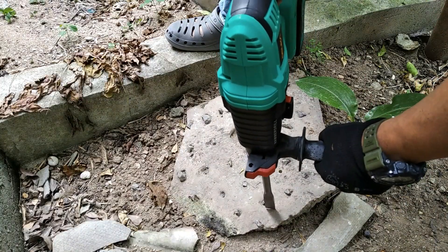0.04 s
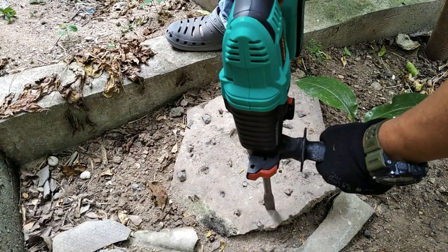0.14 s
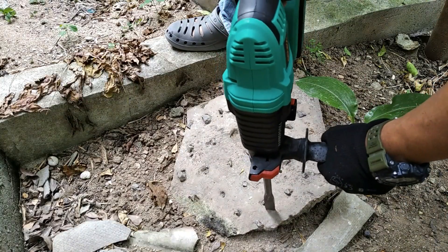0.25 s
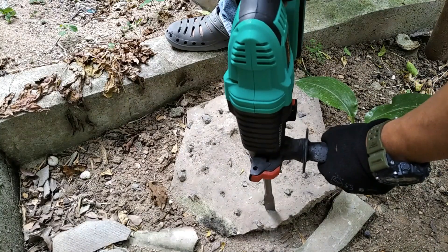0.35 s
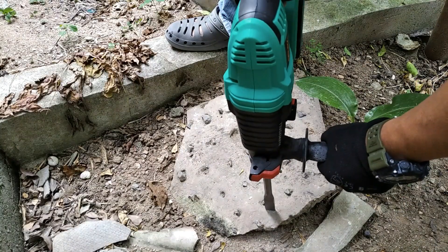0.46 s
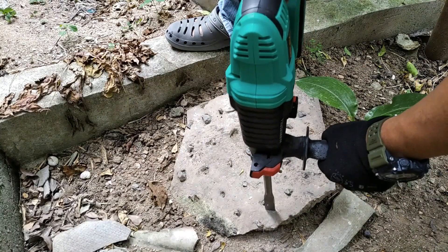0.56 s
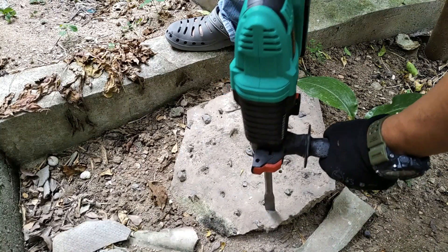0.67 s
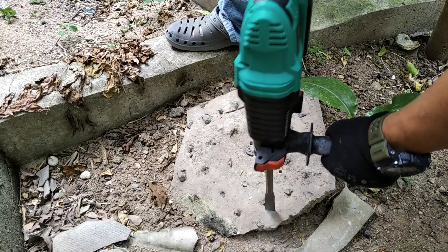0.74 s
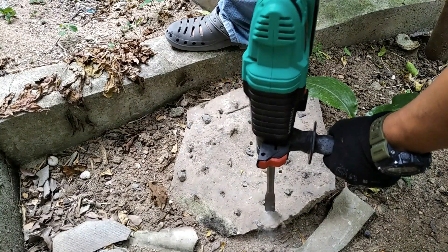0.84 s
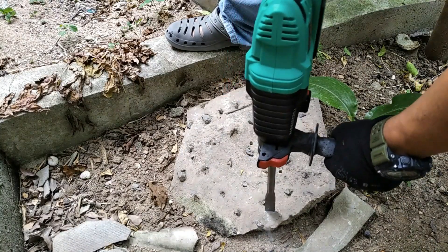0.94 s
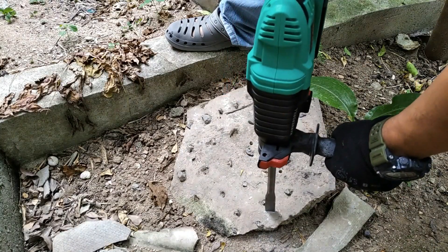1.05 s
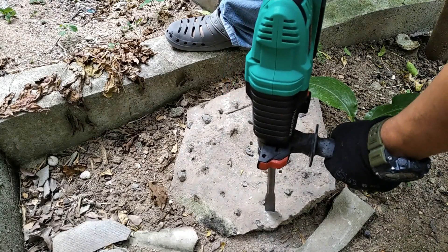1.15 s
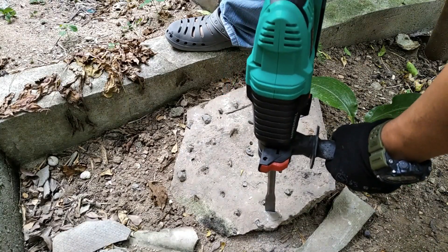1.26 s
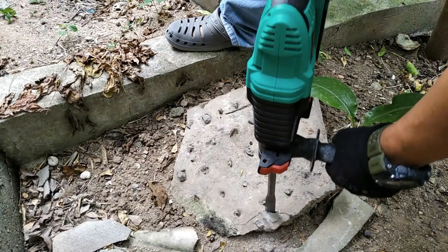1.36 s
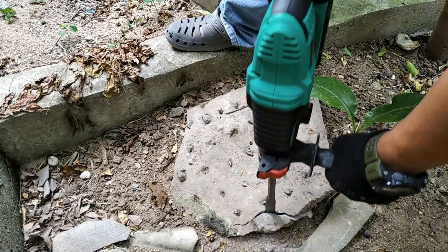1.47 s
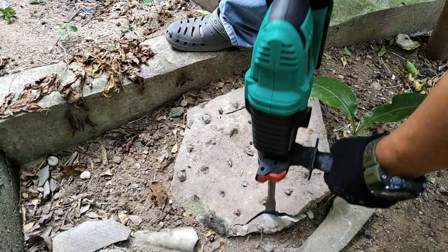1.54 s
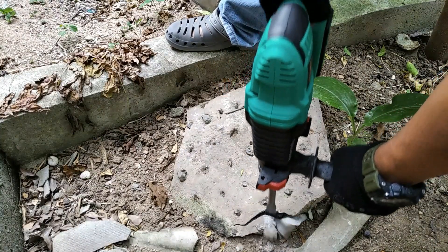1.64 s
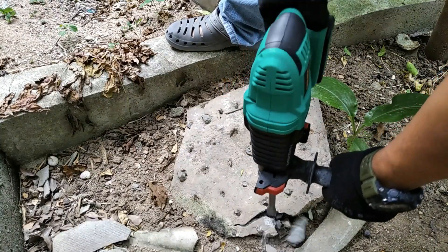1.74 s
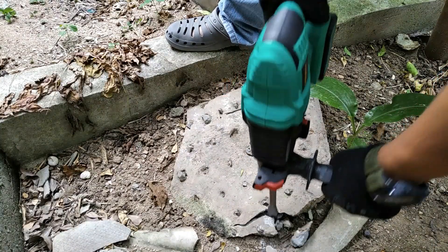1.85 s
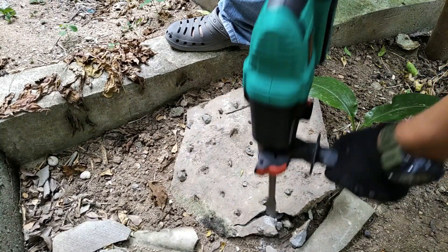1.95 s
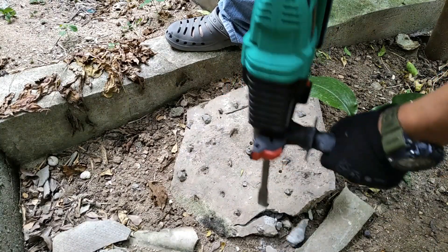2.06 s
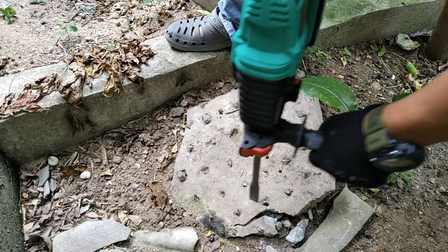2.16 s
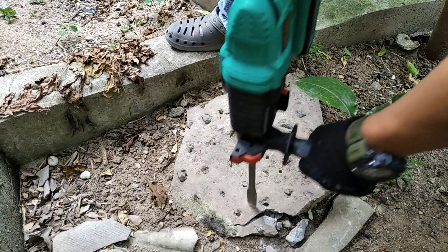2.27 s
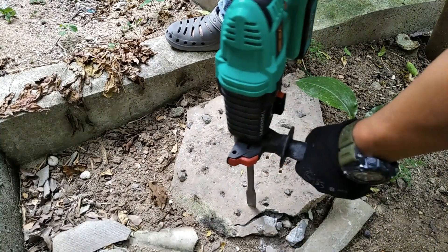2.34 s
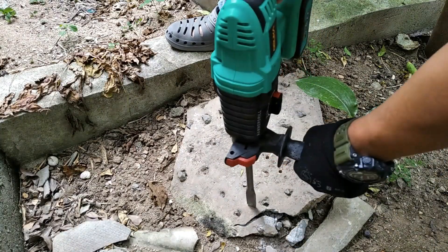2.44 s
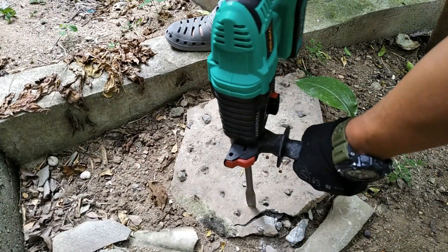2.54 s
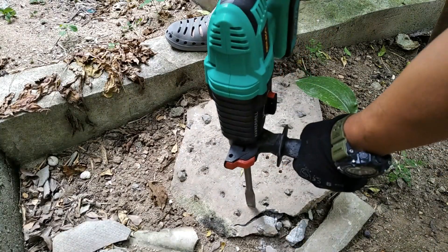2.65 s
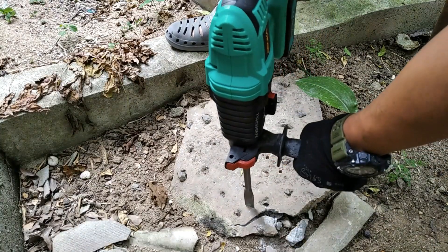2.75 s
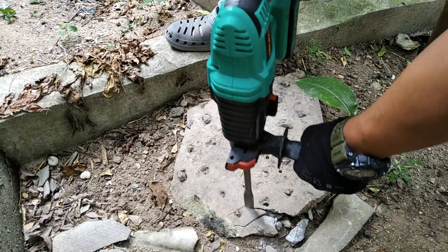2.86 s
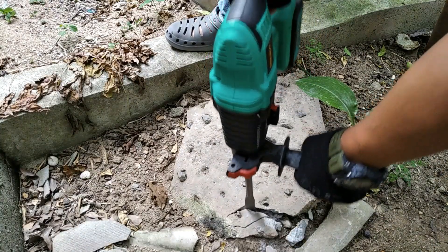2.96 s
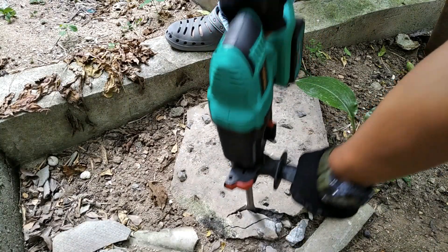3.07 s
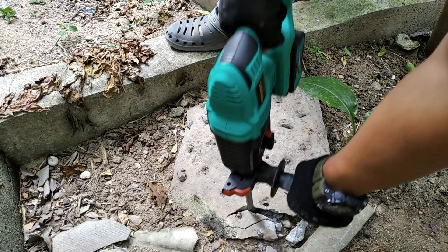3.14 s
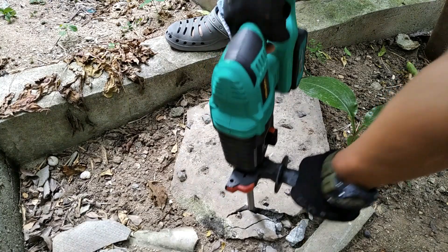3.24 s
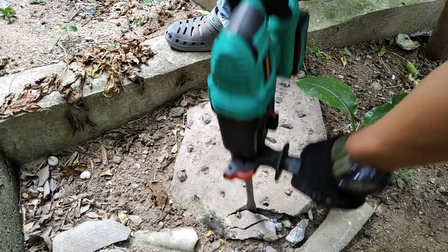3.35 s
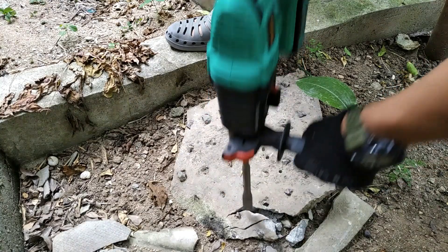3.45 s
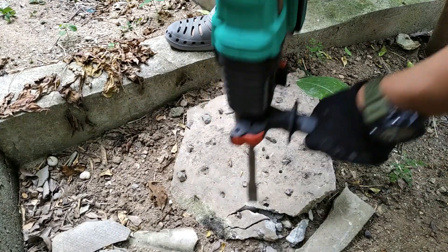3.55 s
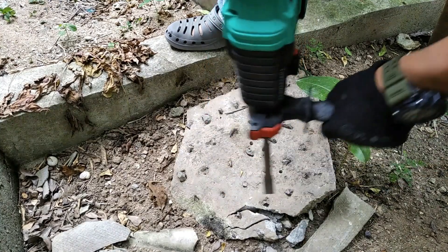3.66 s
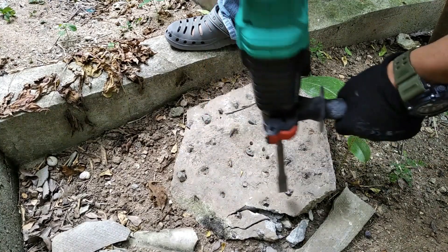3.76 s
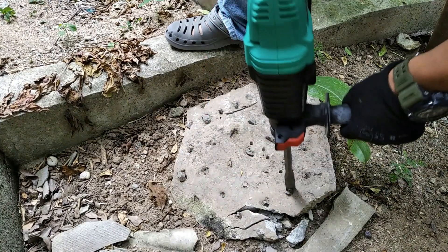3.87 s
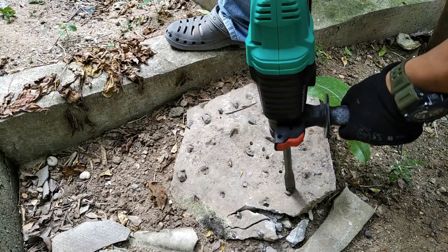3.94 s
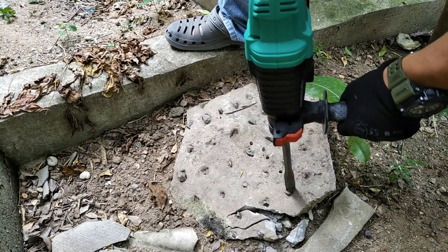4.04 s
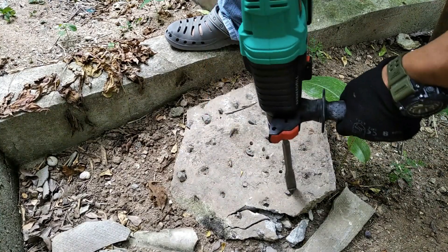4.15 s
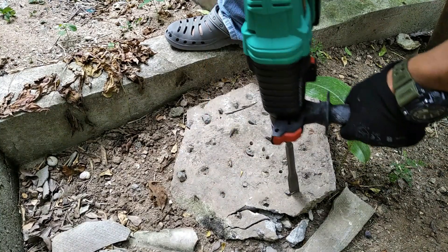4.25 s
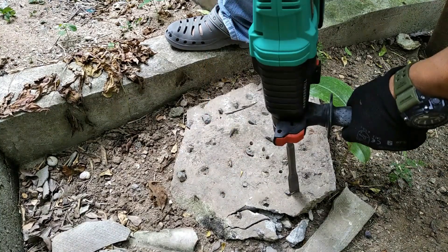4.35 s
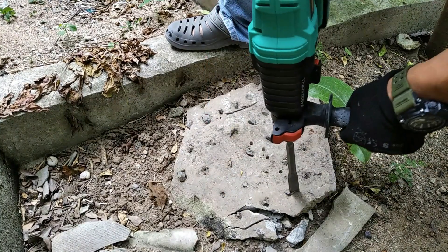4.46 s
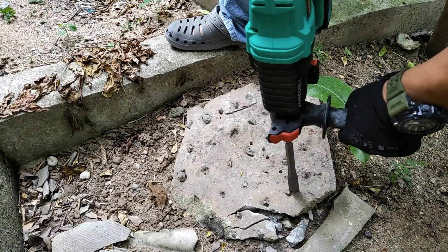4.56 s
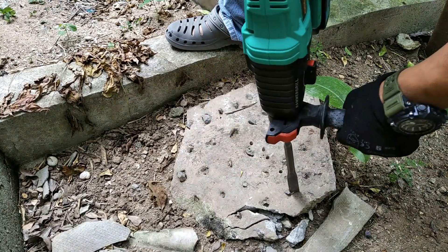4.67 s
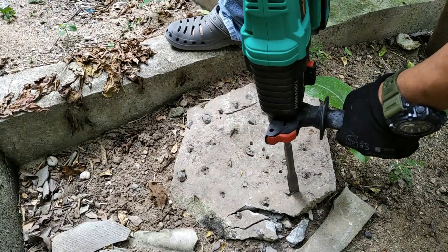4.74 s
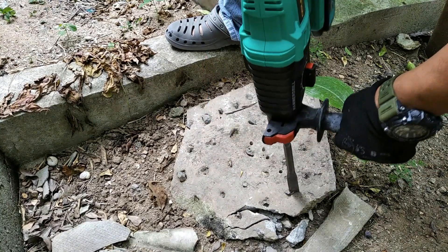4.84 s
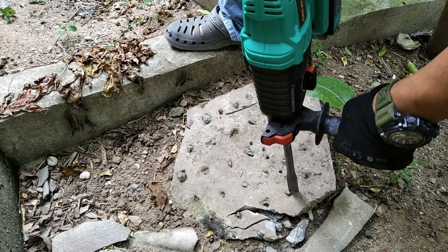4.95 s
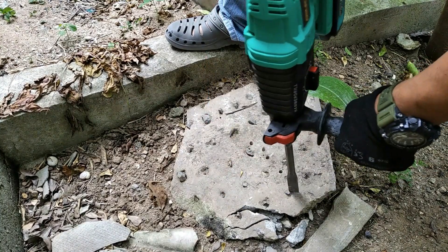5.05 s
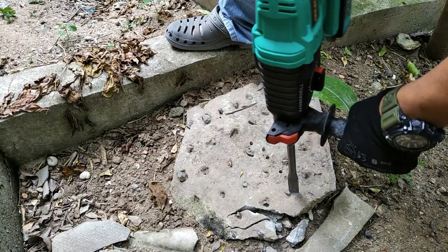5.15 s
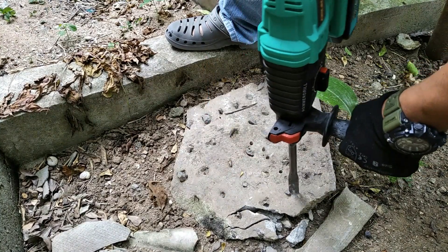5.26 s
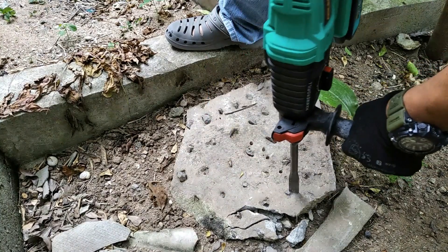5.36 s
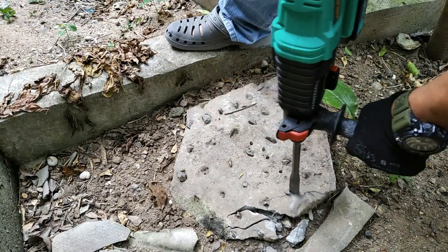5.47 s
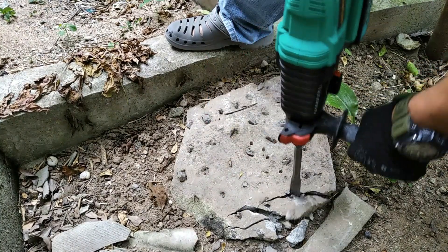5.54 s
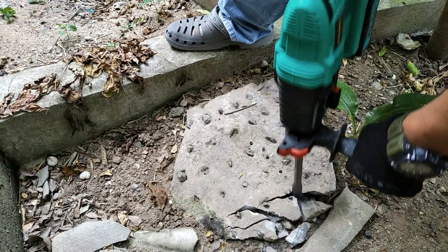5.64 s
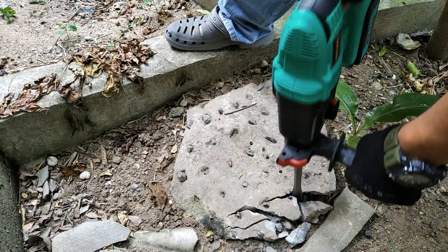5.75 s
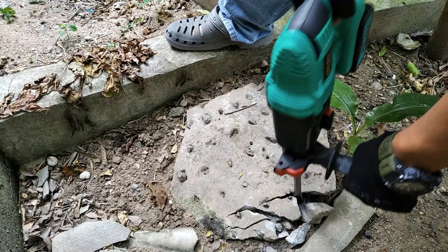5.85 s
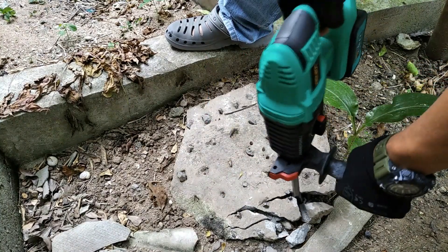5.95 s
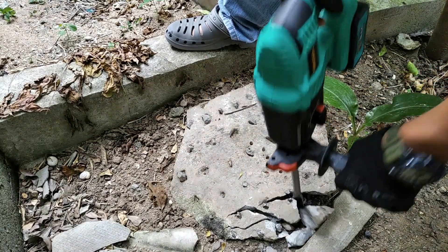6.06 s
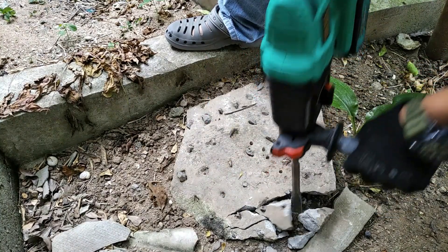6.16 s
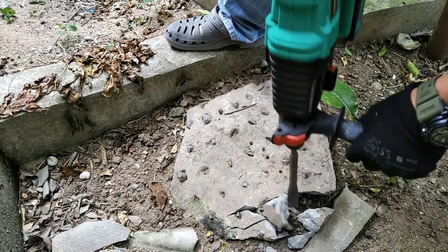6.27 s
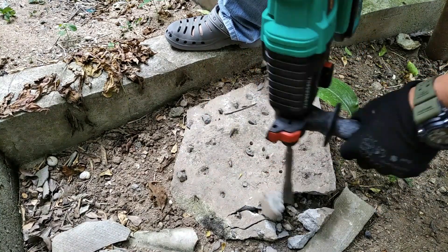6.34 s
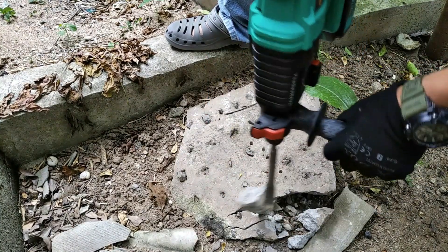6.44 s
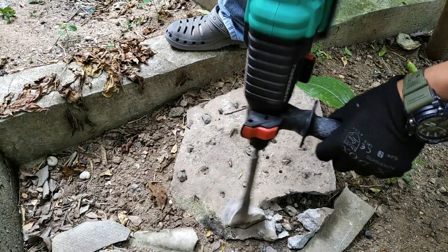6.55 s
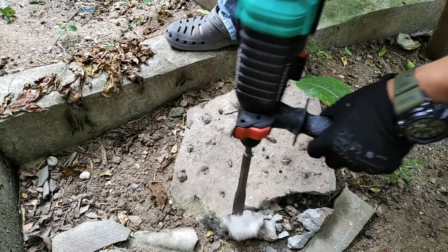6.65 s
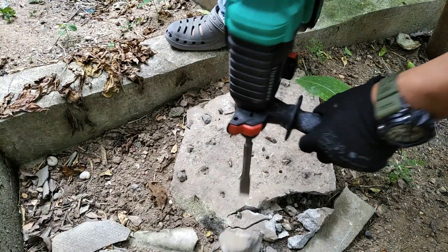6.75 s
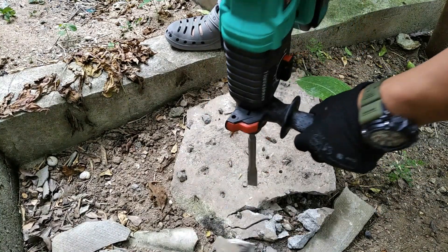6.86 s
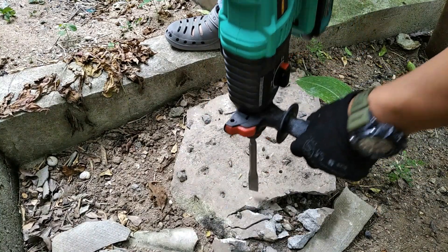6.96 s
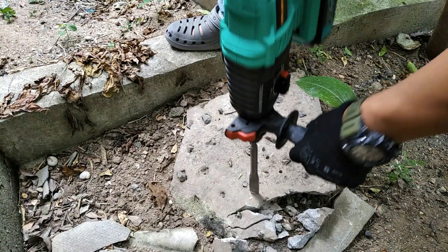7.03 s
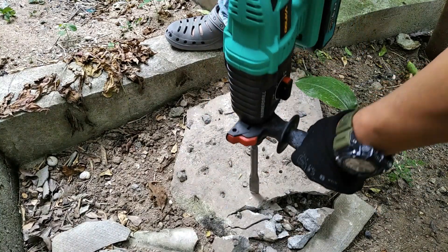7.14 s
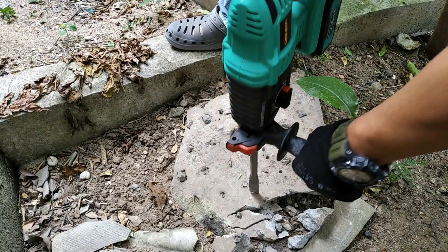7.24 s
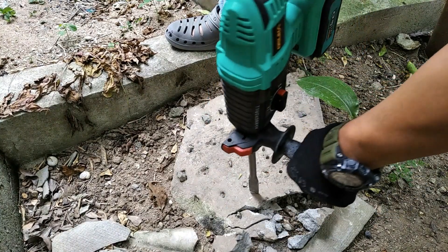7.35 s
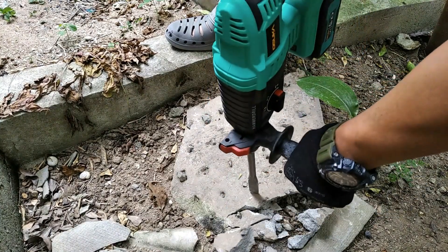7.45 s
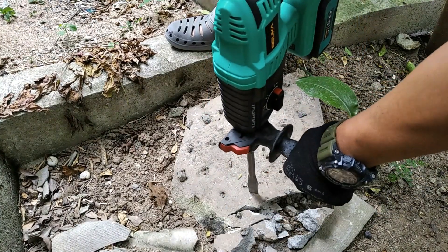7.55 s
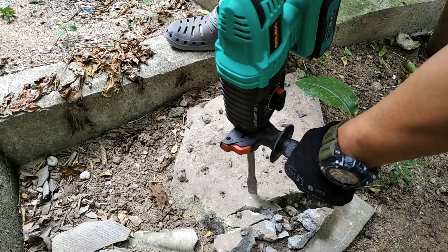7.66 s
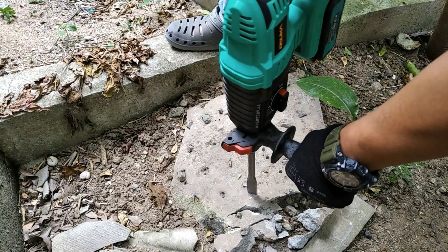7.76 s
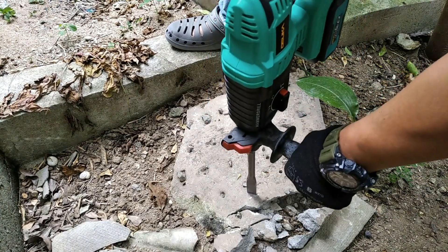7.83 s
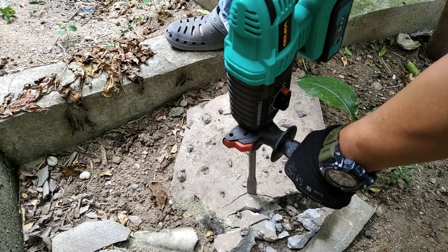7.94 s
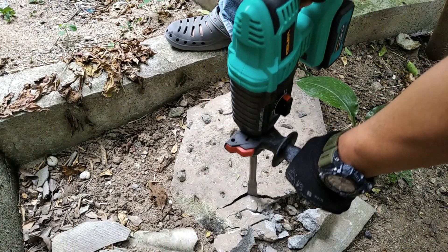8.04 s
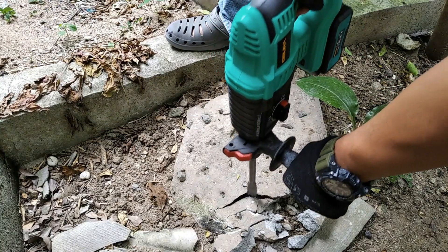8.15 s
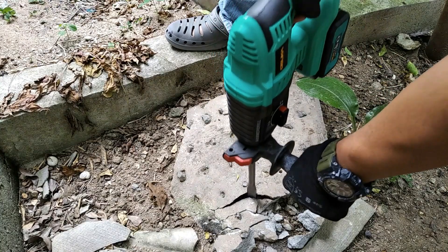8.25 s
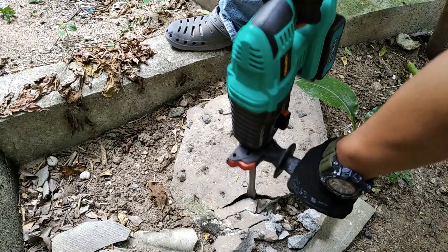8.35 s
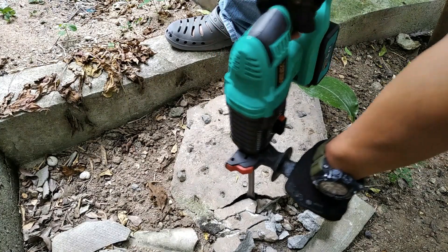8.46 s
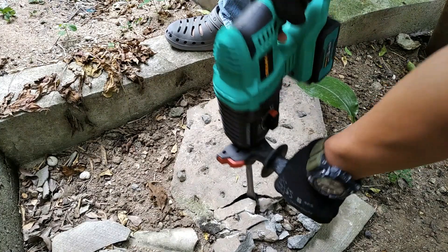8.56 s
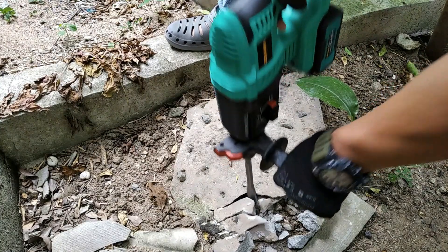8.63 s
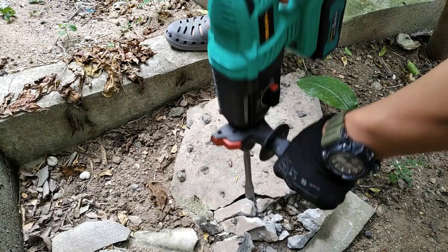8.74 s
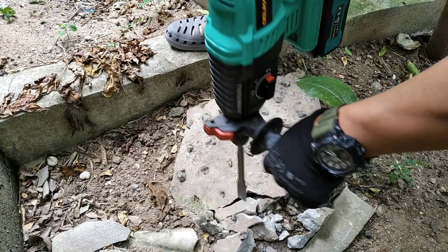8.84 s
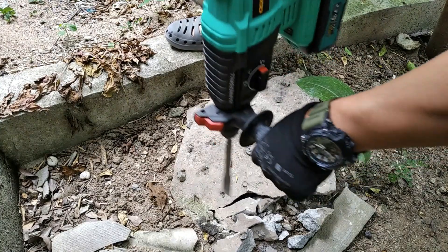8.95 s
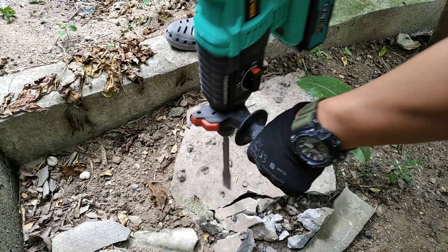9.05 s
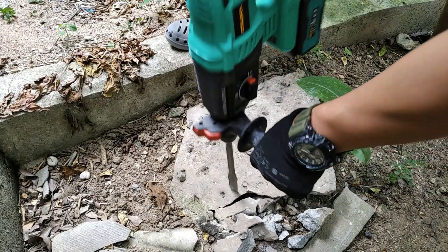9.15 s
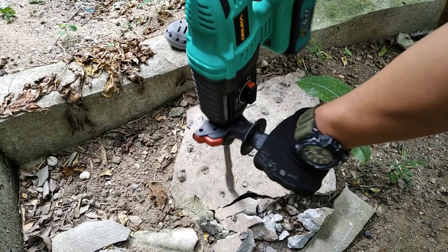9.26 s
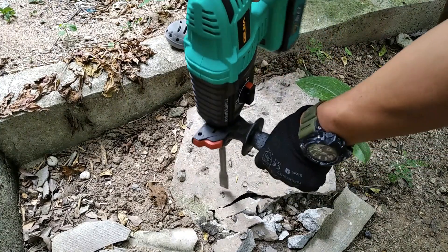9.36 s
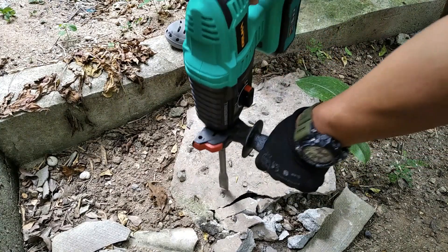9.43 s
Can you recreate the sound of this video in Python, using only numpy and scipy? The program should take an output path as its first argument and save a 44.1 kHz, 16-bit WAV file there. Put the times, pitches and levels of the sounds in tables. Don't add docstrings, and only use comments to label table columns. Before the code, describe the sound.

Close stereo outdoors, with low town hum and a dove's faint purr. At about 0.1 s a switch clicks and a cordless rotary hammer starts, thudding through concrete over gritty gearbox rattle. It dips near 1.2 s, is pulled again, and at 1.6 s the slab splits: thuds thin, bright cracks, hiss and ringing steel take over until it slows by 2.3 s. A knock on stone at 2.5 s, a very faint far horn from 2.3 to 3.5 s. Second burst 2.7-3.8 s, breaking at 3.1 with a sharp clang at 3.2. Knocks and a short scrape around 4.0-4.5 s. Third burst 4.7-6.3 s, whining as it speeds up, splitting at 5.7. Rubble clacks, chips and a soft coo, 6.4-7.5 s. Last burst 7.55-9.1 s, bright from 8.1, winding down after 8.7; final knocks at 9.4 s as the dove coos.

```python
import sys
import numpy as np
from scipy import signal
from scipy.fft import rfft, irfft
from scipy.io import wavfile
from scipy.ndimage import uniform_filter1d

SR = 44100
rng = np.random.default_rng(int(sys.argv[2]) if len(sys.argv) > 2 else 0)


def how_loud(loudness_db):
    steps = np.asarray(loudness_db, float) / 20
    return 10 ** steps


def inscribe(sig):
    pcm = np.round(np.clip(np.atleast_2d(sig).T, -1, 1) * 32767)
    wavfile.write(sys.argv[1], SR, pcm.astype(np.int16))


N = 418950
T = np.arange(N) / SR

# t/s, rate/(blows per s)
SPEED = [
    [(.067, 5), (.125, 11.99), (.3381, 33.87), (.8087, 34.11), (.9529, 52.76), (1.0225, 58.13),
     (1.1125, 53.57), (1.1598, 24.64), (1.2358, 4.94)],
    [(1.2358, 4.94), (1.3144, 18.96), (1.5746, 56.21), (1.8936, 59.91), (2.006, 16.1), (2.1814, 11.58),
     (2.297, 5.87)],
    [(2.706, 5), (2.7526, 14.3), (3.0294, 55.24), (3.4103, 61.38), (3.5385, 23.5), (3.6515, 5.91),
     (3.825, 6.32)],
    [(4.683, 12), (4.736, 24.35), (4.7946, 27.45), (5.0191, 60.6), (5.1691, 57.85), (5.2167, 62.91),
     (5.4592, 58.57), (6.0418, 61.19), (6.286, 30.66)],
    [(7.552, 4.9), (7.589, 13.14), (7.866, 53.49), (7.95, 57.57), (8.6717, 60.92), (8.7301, 31.05),
     (9.0072, 9.86), (9.122, 7.52)],
]
# tip firmly seated t/s, slab splits t/s, tool lifts off t/s
STAGES = [
    (.1, 1.26, 1.27),
    (1.3, 1.57, 2.0),
    (2.74, 3.082, 3.48),
    (5.2, 5.69, 6.2),
    (7.64, 8.115, 8.715),
]
# f/Hz, level/dB
RATTLE_SPECTRUM = [(29, -60), (50, -16), (113, -21), (147, -12.5), (294, -14.5), (332, -11), (612, -9),
                   (750, 2.5), (1690, 0.5), (2250, 1.5), (3990, -2.5), (5090, -21.5), (6500, -20),
                   (8450, -52.5), (14300, -120)]
# f/Hz, level/dB
HISS_SPECTRUM = [(3240, -39), (5500, -13.5), (5870, -13), (7320, -8), (8160, 1), (10700, -0.5),
                 (13400, -6.5), (14300, -16), (14700, -28.5), (15500, -76.5)]


def rms_one(x):
    return x / np.sqrt(np.mean(x ** 2) + 1e-20)


def ramp(t, end_s, length_s):
    return np.clip(1 + (t - end_s) / length_s, 0, 1)


def in_time(tables, silent=-120):
    out = np.full((len(tables[0][0]) - 1, N), float(silent))
    for rows in tables:
        s, *columns = np.transpose(rows)
        inside = (T >= s[0]) & (T <= s[-1])
        out[:, inside] = [np.interp(T[inside], s, c) for c in columns]
    return out


def coloured(x, spectrum):
    hz, db = np.transpose(spectrum)
    grid_hz = np.arange(2049) * SR / 4096
    log_gain = np.log(how_loud(np.interp(np.log(grid_hz + 1), np.log(hz), db)))
    cepstrum = irfft(log_gain) * np.r_[1, np.full(2047, 2), 1, np.zeros(2047)]
    response = irfft(np.exp(rfft(cepstrum)))
    return signal.oaconvolve(x, np.broadcast_to(response, (2, 4096)), axes=1)[:, :N]


def stereo_noise(alike):
    mid, side = rng.standard_normal((2, N))
    alike = np.clip(alike, 0, 1)
    return np.sqrt(1 + alike) * mid + np.sqrt(1 - alike) * side * [[1], [-1]]


def drift(rate_hz):
    r = np.exp(-2 * np.pi * rate_hz / SR)
    wander = signal.lfilter([1], [1, -2 * r, r * r], rng.standard_normal(N + SR))
    return rms_one(wander[SR:])


def resonate(x, hz, width_hz):
    r = np.exp(-np.pi * width_hz / SR)
    poles = [1, -2 * r * np.cos(2 * np.pi * hz / SR), r * r]
    return signal.lfilter([(1 - r * r) / 2, 0, (r * r - 1) / 2], poles, x + 1e-18)


def walls(x, wet_db, t60):
    echo = rng.standard_normal((2, 2600)) * how_loud(-60 * np.arange(2600) / SR / t60)
    echo *= how_loud(wet_db) / np.linalg.norm(echo, axis=1, keepdims=True)
    echo[:, 0] = 1
    return signal.oaconvolve(np.broadcast_to(x, (2, N)), echo, axes=1)[:, :N]


def puffs(clicks, t60, rise_s=0.0012):
    r = np.exp(-1 / (rise_s * SR))
    decay = signal.lfilter([1], [1, -how_loud(-60 / (t60 * SR))], clicks + 1e-18)
    return signal.lfilter([1 - r], [1, -r], decay)


def garden():
    # f/Hz, level/dB
    town_spectrum = [(32, -37), (55, 1), (148, -7), (556, -5), (687, -5.5), (1160, -13.5), (3190, -21.5),
                     (5110, -26), (5620, -44.5), (8000, -24.5), (9670, -23.5), (14100, -28.5), (15500, -62)]
    # t/s, level/dB
    coos = [
        [(0, -48), (.1, -67)],
        [(3.85, -99), (4.0, -45), (4.4, -57), (4.62, -58)],
        [(6.62, -59), (7.0, -57.5), (7.1, -51.5), (7.55, -49)],
        [(9.3, -81), (9.5, -37)],
    ]
    # f/Hz, level/dB rms
    horn_tones = [(312.2, -67), (376.8, -63.5), (441.4, -63.5)]
    town = how_loud(-53.5 + 1.0 * drift(7.4)) * rms_one(coloured(stereo_noise(0.37), town_spectrum))
    hum = how_loud(-59.5) * rms_one(resonate(resonate(rng.standard_normal(N), 123, 28), 123, 30))
    coo_db, = in_time(coos)
    throb = np.sin(np.pi * 43 * T + 0.42 * drift(5)) ** 2
    pitch_hz = 750 + 30 * drift(4) + 45 * drift(60)
    dove = how_loud(coo_db + 2.5 * drift(12)) * throb * np.sin(2 * np.pi * np.cumsum(pitch_hz) / SR)
    horn_start_s, horn_end_s = 2.3, 3.5
    swell = np.clip(np.minimum(T - horn_start_s, horn_end_s - T) / 0.09, 0, 1)
    horn = swell * sum(how_loud(db + 2.5) * np.sin(2 * np.pi * hz * T) for hz, db in horn_tones)
    return town + hum + walls(dove + horn, wet_db=2.0, t60=0.066)


def trigger():
    # t/s, peak level/dB
    snaps = [
        (0.0679, -15),
        (2.7092, -11),
        (4.6859, -12.5),
        (7.5538, -13),
    ]
    clicks = np.zeros(N)
    for s, db in snaps:
        for lag_s, lag_db in [(-.001, -18.5), (.001, -15), (.0037, -28.5), (.007, -45.5)]:
            clicks[round((s + lag_s) * SR)] = how_loud(db + lag_db)
    shell_modes = [(3200, 33.3), (2540, 28.7)]  # f/Hz, level/dB
    body = sum(how_loud(db) * resonate(resonate(clicks, hz, 330), hz, 620) for hz, db in shell_modes)
    snap = coloured(puffs(clicks, 0.016) * stereo_noise(.3), HISS_SPECTRUM)
    return walls(body, wet_db=22.0, t60=0.019) + how_loud(5.5) * snap


def piston_turns(speed):
    s, per_s = np.transpose(speed)
    turns = np.cumsum(np.interp(T, s, per_s)) / SR
    return turns - turns[round(s[1] * SR)]


def gearbox():
    # t/s, level/dB
    gear_levels = [
        [(.08, -28), (.14, -23.5), (.24, -18.5), (.58, -23.5), (1.13, -17.5), (1.19, -29), (1.24, -21.5)],
        [(1.24, -25.5), (1.34, -21), (1.5, -21), (1.64, -14), (1.76, -16.5), (1.92, -17), (2.24, -31.5),
         (2.36, -44), (2.46, -51)],
        [(2.72, -25), (2.8, -19.5), (3.22, -16.5), (3.44, -13), (3.69, -25.5), (3.78, -31.5), (3.84, -42.5),
         (3.9, -72)],
        [(4.69, -39.5), (4.79, -18), (4.89, -13.5), (5.41, -19), (5.91, -15.5), (6.13, -16.5), (6.285, -12),
         (6.315, -27), (6.43, -49.5)],
        [(7.56, -26.5), (7.68, -14), (7.74, -18.5), (8.68, -16), (8.72, -18.5), (8.79, -16), (9.12, -36.5),
         (9.24, -47.5), (9.32, -68)],
    ]
    # t/s, level/dB
    whine_levels = [
        [(.08, -29), (.16, -24), (.26, -25), (.34, -32), (.72, -37), (.85, -44)],
        [(1.26, -36), (1.36, -28), (1.5, -40)],
        [(2.72, -31), (2.84, -26), (2.95, -40)],
        [(4.7, -29), (4.86, -22), (4.93, -23), (4.98, -15), (5.12, -25), (5.35, -36)],
        [(7.57, -29), (7.72, -27), (7.85, -37), (8.3, -37), (8.45, -31), (8.7, -32)],
    ]
    # multiple of piston speed, level/dB
    tooth_tones = [(38.6, 0), (57.6, -7), (75.6, 0), (95.5, -1), (114.6, -9), (133.7, -5), (152.8, -4)]
    rattle_db, = in_time(gear_levels)
    flying = sum(ramp(T, split_s, 0.071) - ramp(T, lift_s, 0.15) for _, split_s, lift_s in STAGES)
    hiss_db = rattle_db - 8 + 3.5 * flying + 0.22 * (rattle_db + 12)

    starts = [speed[0][0] for speed in SPEED]
    pull_now = np.clip(np.searchsorted(starts, T) - 1, 0, 4)
    turns = np.choose(pull_now, [piston_turns(speed) for speed in SPEED])
    throb = how_loud(2.0 * np.cos(2 * np.pi * turns - .8))
    rattle = coloured(stereo_noise(.45) * how_loud(2.7 * drift(250) + .8 * drift(25)), RATTLE_SPECTRUM)
    hiss = coloured(stereo_noise(0.04) * how_loud(1.3 * drift(520) + 2.0 * drift(25)), HISS_SPECTRUM)

    per_sample = np.clip(np.gradient(turns), 0, 70 / SR)
    shake_level = how_loud(-33 + 7.5 * flying + 4.3 * drift(7.4)) * (per_sample * SR / 60) ** 4
    shake = shake_level * np.sin(4 * np.pi * turns)

    even = uniform_filter1d(per_sample, size=SR // 6)
    rotor = np.cumsum(even)
    gain_per_s2 = uniform_filter1d(np.gradient(even), size=SR // 20) * SR * SR
    pull = np.clip(gain_per_s2 / 150, 0, 1) ** 5
    teeth = sum(how_loud(db + 1.5 * drift(30)) * np.sin(2 * np.pi * multiple * rotor + .5 * drift(60))
                for multiple, db in tooth_tones)
    housing_hz, housing_width_hz = 2480, 330
    lit = resonate(resonate(teeth, housing_hz, housing_width_hz * 1.6), housing_hz, 1100)
    upper = resonate(resonate(teeth, 3300, 500), 3300, 900)
    lit = lit + pull * (how_loud(-16) * teeth - how_loud(-8) * upper)
    whine = walls(how_loud(in_time(whine_levels)[0] + 5) * lit, wet_db=-3, t60=.02)

    running = how_loud(rattle_db - 3.5) * (rms_one(rattle) + shake)
    return throb * (running + how_loud(hiss_db - 0.5) * rms_one(hiss)) + whine


def blows():
    # f/Hz, width/Hz, level/dB
    slab_modes = [
        [(239, 116, -23.5), (804, 231, -5.5), (1100, 315, -2), (1870, 634, 3.5), (3230, 440, -4.5),
         (540, 155, -19.5)],
        [(227, 140, -16.5), (812, 227, -2), (1083, 170, -7), (2200, 540, -2), (3370, 170, -12.5),
         (508, 110, -25)],
        [(256, 51, -30.5), (573, 355, -12.5), (1062, 165, -8), (2150, 350, -2.5), (3280, 190, -15.5),
         (1590, 490, 0.5)],
        [(236, 120, -19.5), (765, 385, -0.5), (1390, 630, -16), (2280, 250, -4), (3120, 780, -5),
         (518, 135, -20)],
    ]
    spots = [0, 0, 1, 2, 3]
    # f/Hz, width/Hz, level/dB
    crushed_mode = (1600, 950, -1)
    # slab thud/dB, tip crack/dB, held ring/dB, free ring/dB, lifted loss/dB
    strengths = [(-13, -11, -24, -14, 5), (-14, -13, -24, -17, 21), (-12.5, -10.5, -20.5, -18.5, 13),
                 (-10, -15, -25.5, -19, 20), (-12, -10.5, -22, -21, 34)]
    # t/s, level/dB
    clangs = [(1.734, -18), (2.032, -17), (2.099, -16), (2.181, -26), (2.296, -29), (3.142, -14),
              (3.224, -1.5), (3.229, 3), (3.246, -9), (3.824, -41), (5.699, -23), (6.02, -11),
              (7.263, -22.5), (8.61, -16), (8.644, -18), (8.696, -15.5), (9.371, -33)]
    thud, crack, free, held = np.zeros((4, N))
    for speed, spot, stage, strength in zip(SPEED, spots, STAGES, strengths):
        s, per_s = np.transpose(speed)
        turns = piston_turns(speed)
        blow_count = round(np.interp(s[-1], T, turns)) + 1
        when = np.interp(np.arange(blow_count), turns, T)
        at = ((when - .0012) * SR).astype(int)
        seated_s, split_s, lift_s = stage
        thud_db, crack_db, held_db, free_db, lifted_db = strength
        loose = ramp(when, split_s, 0.029)
        lifted = lifted_db * ramp(when, lift_s, 0.01)
        octaves = np.minimum(0, np.log2(np.interp(when, s, per_s) / 31.6))
        slow = 6 * octaves * (1 - loose)
        skating = 5 * (1 - ramp(when, seated_s, .3))
        chance = rng.standard_normal((len(at), 9))
        uneven = 2.5 * loose * chance[:, 8]
        free_crack_db = -11.5
        cracking_db = crack_db + loose * (free_crack_db - crack_db)
        crack[at] = how_loud(cracking_db + slow - lifted + uneven + 2.2 * chance[:, 7])
        free[at] = loose * how_loud(free_db - 24 * ramp(when, lift_s, 0.031) + 2.5 * chance[:, 6])
        held[at] = (1 - loose) * how_loud(held_db + slow - skating + 0.83 * chance[:, 6])
        blow_db = thud_db - skating - 13 * loose - 1.14 * lifted + uneven
        for k, (hz, width_hz, mode_db) in enumerate(slab_modes[spot] + [crushed_mode]):
            clicks = np.zeros(at[-1] - at[0] + 4000)
            clicks[at - at[0]] = how_loud(blow_db + mode_db + 1.9 * chance[:, k]) * SR / width_hz
            swell = resonate(resonate(clicks, hz, 1.3 * width_hz), hz, 1.3 * width_hz)
            thud[at[0]:at[-1] + 4000] += resonate(swell, hz, 1.6 * width_hz) * (-1) ** k
    for s, db in clangs:
        free[round(s * SR)] += how_loud(db)
    tip = how_loud(1.5) * coloured(puffs(crack, 0.012, rise_s=0.001) * stereo_noise(0.72), HISS_SPECTRUM)
    slab = walls(how_loud(-4) * thud, wet_db=-9, t60=.016)
    return slab + tip + steel(free, damping=1.2) + how_loud(-8) * steel(held, damping=2.6)


def steel(strike, damping):
    # f/Hz, level/dB, t60/s
    shank_modes = [(13720, -2, .055), (13900, -2, .025), (14100, -2, .018), (8540, -19, .015),
                   (10600, -17, .015)]
    shock = puffs(strike, 0.0055) * stereo_noise(0.073)
    ring = sum(how_loud(db + 36.0) * resonate(resonate(shock, hz, damping * 2.2 / t60), hz, 1800)
               for hz, db, t60 in shank_modes)
    return ring * how_loud([[1.5], [-1.5]])


def knocks():
    # t/s, peak level/dB, ring f/Hz, brightness/dB
    hits = [(2.478, -34, 996, -12), (2.495, -42, 969, -18), (2.508, -14, 1100, -7.5),
            (2.527, -20.5, 765, -12), (2.583, -37, 1870, -11), (3.817, -37, 1830, 12), (4.046, -18, 850, 3),
            (4.061, -25, 860, -22), (4.092, -16, 1840, -10), (4.107, -24.5, 750, -38),
            (4.499, -22.5, 756, -18), (6.443, -35.5, 1020, -36), (6.466, -29.5, 1590, -5),
            (6.488, -25, 2530, -3), (6.508, -28.5, 1520, -10), (6.529, -32, 1450, -4),
            (6.657, -33, 800, -27), (6.789, -29, 2200, -3.5), (6.803, -23.5, 1770, -5),
            (6.932, -27.5, 980, 10.5), (6.995, -35.5, 2640, 6.5), (7.156, -31.5, 2860, 14.5),
            (7.257, -22, 1500, -5), (7.264, -14, 910, -13.5), (7.434, -35, 860, -25),
            (7.456, -22, 650, 5.5), (7.466, -9.5, 1080, -25), (9.372, -14, 830, -9),
            (9.381, -25.5, 1010, -5), (9.469, -25, 774, -20)]
    ring, dust, spit = np.zeros((3, N))
    for s, db, hz, bright_db in hits:
        i = round(s * SR)
        click = np.r_[how_loud(db), np.zeros(2999)]
        chip = resonate(resonate(click, hz, .3 * hz), hz, .6 * hz)
        ring[i:i + 3000] += (SR / (.4 * hz) * chip)[:N - i]
        dust[i] = how_loud(db)
        spit[i] = how_loud(db + bright_db)
    bump = how_loud(20) * resonate(resonate(dust, 210, 140), 150, 180)
    dust_puffs = puffs(dust, .035, rise_s=.003) + .05 * puffs(dust, .2)
    spit_puffs = puffs(spit, 0.012, rise_s=0.0037) + 0.04 * puffs(spit, 0.23)
    clatter = coloured(dust_puffs * stereo_noise(.5), RATTLE_SPECTRUM)
    bright = coloured(spit_puffs * stereo_noise(0.17), HISS_SPECTRUM)
    stone = walls(how_loud(-9) * ring + bump, wet_db=2, t60=.05)
    return stone + how_loud(-7.5) * clatter + how_loud(2) * bright + how_loud(-29) * steel(spit, damping=1.1)


def drag():
    # t/s, scrape level/dB, grit level/dB
    scrapes = [
        [(4.18, -49, -70), (4.195, -42, -64), (4.26, -45, -61), (4.275, -58, -54)],
        [(6.57, -58, -62), (6.6, -59, -44), (6.68, -62, -65)],
    ]
    scrape_db, grit_db = in_time(scrapes)
    grit = stereo_noise(0.2) * how_loud(2.05 * drift(200))
    stone = resonate(grit, 2700, 600) + .5 * resonate(grit, 1570, 400) + 0.18 * resonate(grit, 6700, 730)
    scrape = how_loud(scrape_db) * rms_one(resonate(stone, 1700, 2500))
    return scrape + how_loud(grit_db) * rms_one(coloured(grit, HISS_SPECTRUM))


def scene():
    return garden() + trigger() + gearbox() + blows() + knocks() + drag()


def roll_off(x):
    return signal.sosfilt(signal.butter(12, 15700, fs=SR, output="sos"), x)


def record(dry):
    rounded = .9 * np.tanh(dry / .9)
    lowpass = signal.cheby2(12, 80, 15800, fs=SR, output="sos")
    return roll_off(signal.sosfilt(lowpass, rounded))


dry = scene()
out = record(dry)
inscribe(out)
```